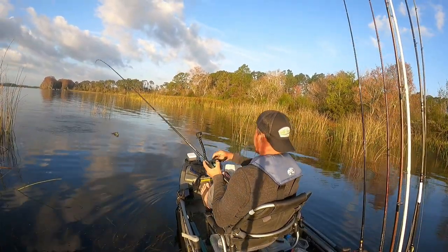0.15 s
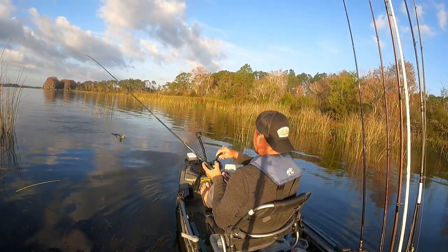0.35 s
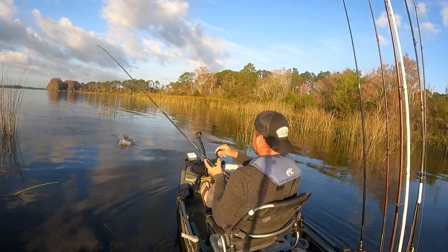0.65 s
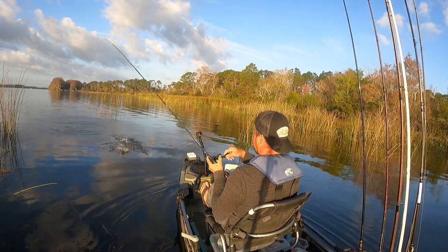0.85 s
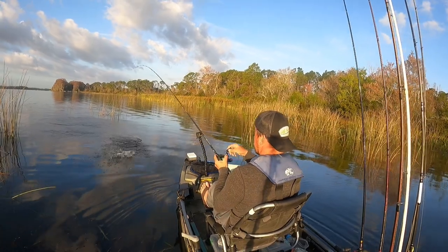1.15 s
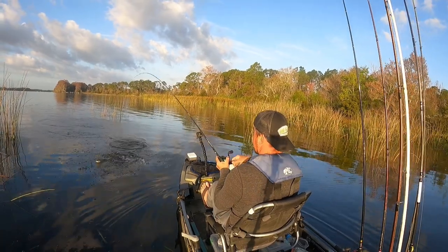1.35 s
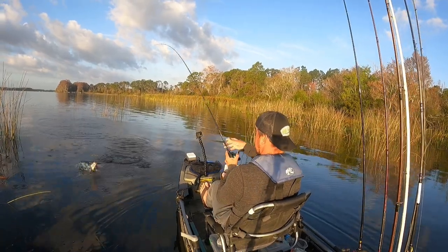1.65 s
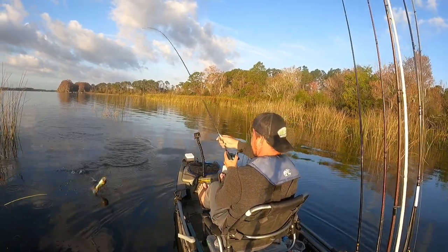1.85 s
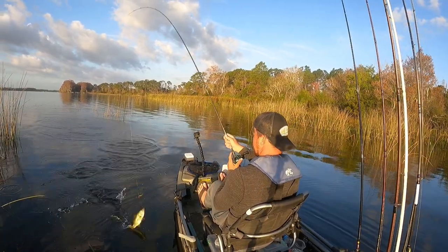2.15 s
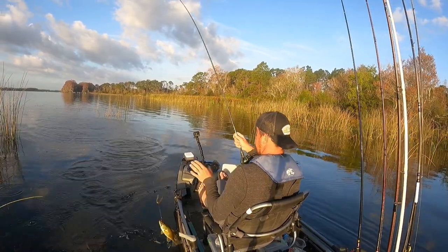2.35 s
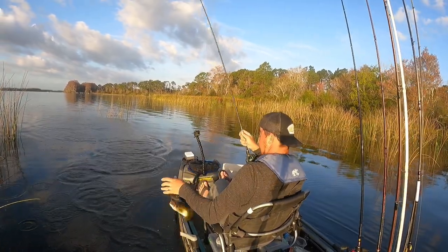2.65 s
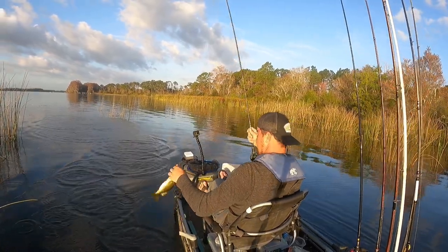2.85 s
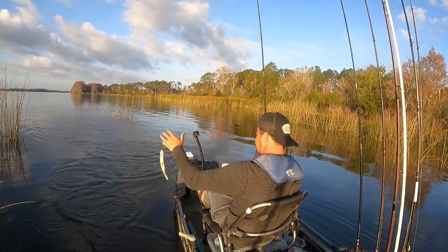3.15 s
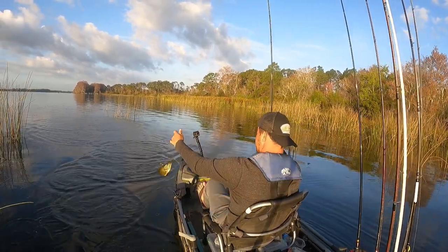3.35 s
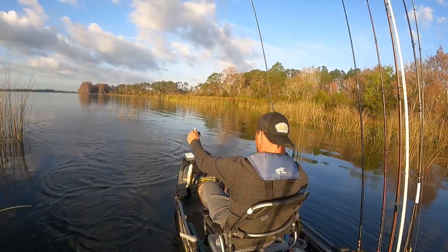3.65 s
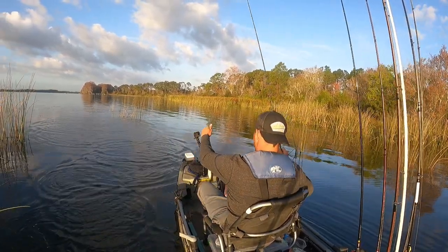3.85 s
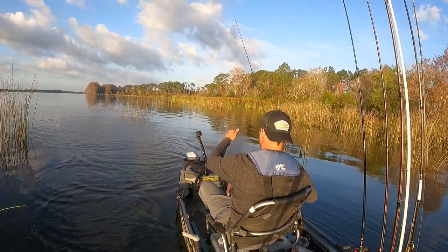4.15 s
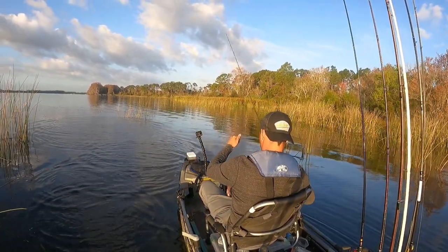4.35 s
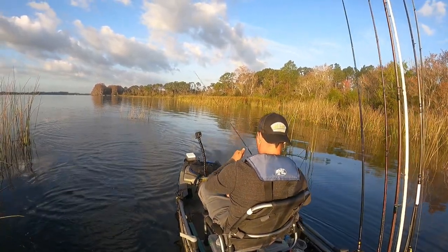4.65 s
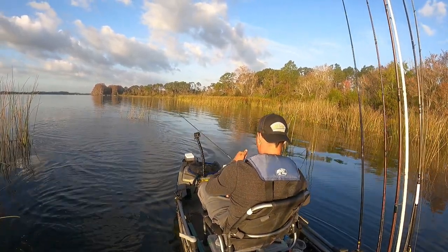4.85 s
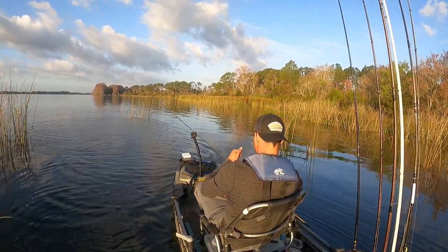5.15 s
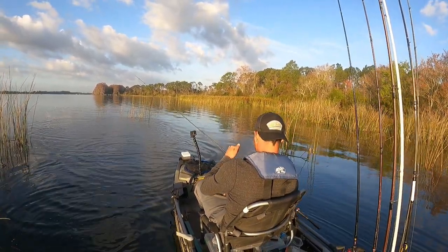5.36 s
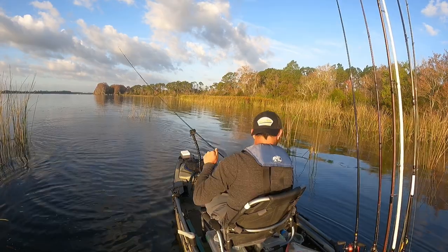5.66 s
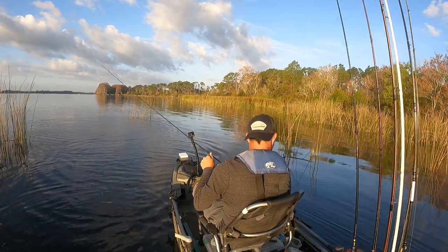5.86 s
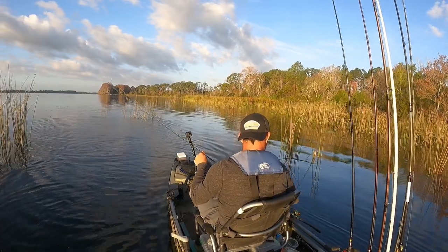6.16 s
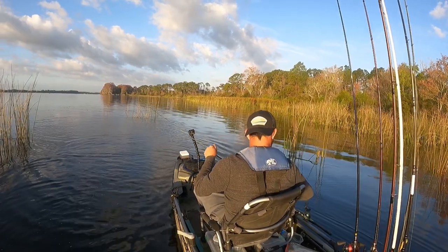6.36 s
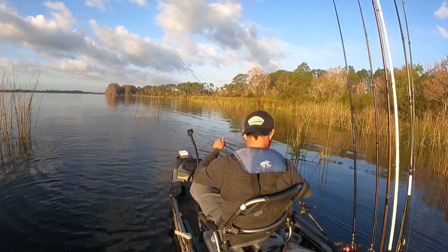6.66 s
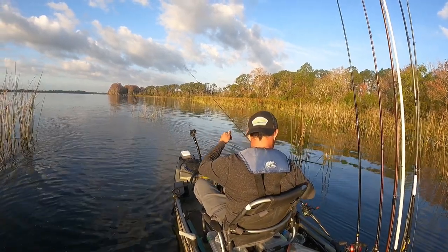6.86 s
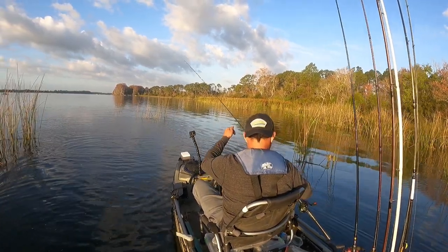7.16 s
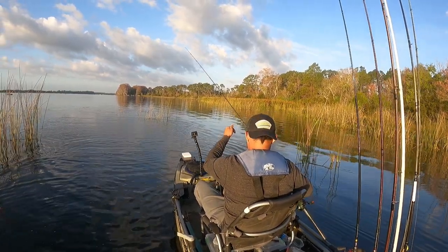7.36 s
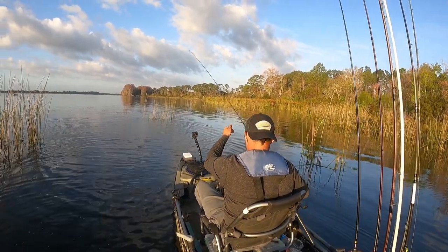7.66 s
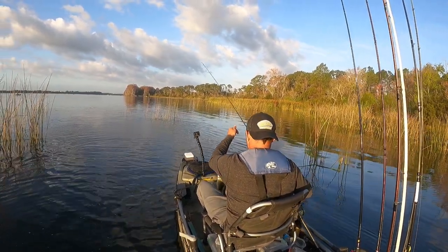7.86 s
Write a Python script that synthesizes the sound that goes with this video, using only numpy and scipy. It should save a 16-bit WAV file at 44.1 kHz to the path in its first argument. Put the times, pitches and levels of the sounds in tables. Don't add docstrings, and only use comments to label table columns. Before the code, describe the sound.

Watery thrashing and plops grow brighter, end in a boomy thud, then quiet ticks give way to clattering hollow plastic knocks on a calm lake.

```python
import sys
import numpy as np
from scipy import signal
from scipy.fft import rfft, irfft
from scipy.io import wavfile
from scipy.ndimage import uniform_filter1d

SR = 44100
rng = np.random.default_rng(int(sys.argv[2]) if len(sys.argv) > 2 else 0)


def level_to_linear(level):
    exponent = np.asarray(level, float) / 20
    return 10 ** exponent


def wav_record(signal):
    frames = np.transpose(np.atleast_2d(signal))
    bounded = np.clip(frames, -1, 1)
    quanta = np.round(bounded * 32767).astype(np.int16)
    wavfile.write(sys.argv[1], SR, quanta)


N = 353241
T = np.arange(N) / SR

# time in seconds, spray level in dB.
THRASH = [(0, -42), (.3, -40.5), (.43, -36.5), (.54, -39.5), (.9, -33), (1.4, -38.5), (1.6, -46.5),
          (1.72, -44), (1.85, -47.5), (2.0, -40.5), (2.1, -43.5), (2.2, -41), (2.5, -50.5), (2.7, -50),
          (3.1, -77)]
# pitch in Hz, level in dB per Hz.
SPRAY_COLOUR = [(290, -29), (500, -7), (839, -8.5), (1670, -3.5), (6930, -2), (8230, -19), (13000, -33),
                (15500, -78)]


def spray():
    fizz = 3.53 * rng.standard_normal(N)
    for hz in np.geomspace(700, 13000, 30):
        cycles = rng.choice([6, 9, 18])
        t = np.arange(int(cycles * SR / hz)) / SR
        rising = np.sin(2 * np.pi * hz * t * (1 + 0.081 * t / t[-1]))
        grain = rising * np.hanning(len(t)) * np.sqrt(hz / 1000)
        bursts = grit(per_s=75, spread_db=3.5, size=N // 2)
        add(fizz, 0, 0.51 * signal.oaconvolve(bursts, grain))
    for hz in (4000, 6500, 10000):
        droplets = grit(per_s=70, spread_db=3.3, size=N // 2)
        add(fizz, 0, 27 * band(droplets, 0.75 * hz, 1.4 * hz))
    fizz = patchy(colour(fizz, SPRAY_COLOUR), 2.8, frames=20, bins=7)
    fizz = evened(patchy(fizz, 1.73, frames=4, bins=70))
    farness = np.exp(-T / 0.62)
    dull_db = along(THRASH + [(3.2, -120)])
    bright_db = dull_db + 4 - 8 * farness
    dull = band(fizz, 270, 6740) - farness * band(fizz, 3150, 7000)
    return level_to_linear(dull_db + 4.5) * dull + level_to_linear(bright_db + 10) * band(fizz, 8530, 16300)


# start in seconds, peak in dB, bubble pitch in Hz, brightness in dB.
SLAPS = [(0.208, -27.5, 2110, 2), (0.446, -14.5, 2150, -10), (0.572, -19.5, 1330, 4),
         (0.626, -19, 1630, -5), (0.717, -23, 1640, -1), (0.751, -18.5, 1040, -7), (0.892, -17, 3180, 1),
         (1.167, -19, 1420, -21), (1.4, -23, 3910, 12.5), (1.468, -25, 1620, -4), (1.554, -23.5, 2024, -2),
         (1.597, -22.5, 1230, -5), (1.968, -8, 2200, -4), (2.012, -30, 4770, 10), (2.049, -16, 1540, -7),
         (2.142, -18, 3350, -8), (2.641, -14, 2420, -22), (2.208, -18.5, 5940, -11)]
# start in seconds, peak in dB, bubble pitch in Hz.
DROPS = [(0.245, -21, 2800), (0.274, -19, 1200), (0.96, -9.5, 4070), (0.99, -14, 3960),
         (1.626, -21.5, 2070), (1.693, -28, 4000), (1.716, -15.5, 3950), (1.733, -16.5, 1096),
         (1.753, -22, 1250), (1.787, -27, 990), (1.843, -26.5, 1380), (1.903, -11, 3580),
         (2.056, -13, 1820), (2.274, -26.5, 1240), (2.437, -24.5, 3030), (2.467, -28, 1550),
         (2.615, -17, 915), (2.633, -7.5, 920), (2.685, -21.5, 1270), (2.658, -13, 1050),
         (2.702, -31, 2000), (1.916, -29, 2480)]
# start in seconds, peak in dB, pitch in Hz.
DRIPS = [
    (2.745, -23, 1620),
    (2.902, -31.5, 1680),
]


def slaps_and_drops():
    hits = SLAPS + with_edge(DROPS, -19.5)
    out = snaps(hits, crack=0.66, rise=4.7, ring_s=0.022, tail_db=-22)
    return out + snaps(with_edge(DRIPS, -26), crack=0.12, rise=0.5, ring_s=0.03, tail_db=-30)


# start in seconds, peak in dB, pitch in Hz, time to fall 60 dB in seconds.
GULPS = [
    (0.713, -15.5, 422, 0.036),
    (0.749, -13.5, 940, 0.024),
    (1.241, -4.5, 500, 0.031),
    (1.257, -13.5, 586, 0.039),
]
# start in seconds, peak in dB, pitch in Hz, time to fall 60 dB in seconds.
PLINKS = [(0.349, -26, 2080, 0.026), (0.391, -29, 4140, 0.015), (0.65, -26, 1490, 0.032),
          (0.705, -25, 1620, .03), (0.903, -21, 1086, 0.035), (0.928, -26, 3010, 0.073),
          (1.007, -18, 1900, 0.018), (1.064, -26, 1940, 0.039), (1.095, -31, 1070, 0.039),
          (1.14, -24, 990, 0.039), (1.188, -30, 4220, 0.026), (1.2, -30, 1900, 0.037),
          (1.329, -14.5, 2100, 0.012), (1.358, -16, 7040, 0.0086), (1.424, -22, 2330, 0.031),
          (1.434, -25, 1900, 0.027), (1.448, -25, 1830, 0.034), (1.4886, -13.5, 4900, 0.012),
          (1.509, -27, 1820, 0.053), (1.531, -26.5, 2050, 0.035), (1.576, -32, 1860, 0.058),
          (1.61, -25, 6100, 0.0084), (1.637, -33, 7200, 0.019), (1.823, -21, 2110, 0.011),
          (1.915, -22.5, 7550, 0.024), (1.99, -29, 1500, 0.016), (2.022, -33, 2600, 0.024),
          (2.026, -23, 4760, 0.032), (2.039, -22, 2850, 0.024), (2.05, -19.5, 4680, 0.033),
          (2.065, -24, 3700, 0.03), (2.14, -26, 1810, 0.028), (2.155, -30, 2250, 0.024),
          (2.172, -30, 5340, 0.056), (2.289, -28.5, 2550, 0.026), (2.318, -27.5, 2300, 0.022),
          (2.389, -31, 2100, 0.039), (2.4, -30, 5100, 0.018), (2.6, -32, 1210, 0.02)]


def bubbles():
    return pings(GULPS, rise=4, rough=0.08) + pings(PLINKS, rise=0.8)


# start in seconds, peak in dB,
# hardness as dB of the upper hull modes, pitch of the struck panel in Hz.
THUMPS = [(2.616, -2, -13, 228), (2.639, -3, -10, 99), (2.658, -21, 2, 108), (2.689, -13, -31, 103),
          (4.017, -5, -17, 314), (4.069, -13.5, -44, 270), (4.205, -14.5, -40, 270),
          (4.335, -10.5, -34, 177), (4.381, -16, -33, 98), (7.736, -18, -27, 172), (7.821, -5.5, -24, 254),
          (7.892, -9, -8.5, 240), (7.929, -9, -15, 219), (7.989, -29, -29, 97)]
# start in seconds, peak in dB,
# hardness in dB, panel pitch in Hz.
KNOCKS = [(5.118, -16, 3, 193.5), (5.139, -14.5, 4, 215), (5.208, -21, -1, 227), (5.261, -30, -8, 353),
          (5.389, -15.5, -30, 151), (5.437, -2.5, -0.5, 237), (5.469, 1.5, -30, 146.5),
          (5.545, -5.5, -2.5, 226), (5.6, -10, -13, 221), (5.64, -5.5, -7, 141.4), (5.686, -1.5, -5.5, 211),
          (5.719, -8.5, -16, 161), (5.749, -14, -6.5, 145), (5.881, -25, 0, 215), (5.999, -17.5, -10, 215),
          (6.08, -9.5, -7, 204.6), (6.186, -5, -5, 192), (6.24, -7, -8, 192), (6.272, -6.5, -9, 184),
          (6.314, -4, -6.5, 173.6), (6.434, -6.5, -7.5, 175.3), (6.936, 3, -6.5, 355),
          (6.957, 0.5, -22, 172), (7.024, -8.5, -3.5, 362), (7.058, -17.5, 1, 302), (7.21, -31, 9.5, 173),
          (7.261, -23.5, -5, 384),
          (2.627, -3.5, -13, 275), (4.337, -13.5, -20, 139), (5.447, -1.5, -8, 382), (5.484, -8, -28, 149),
           (5.605, -4, -8, 199), (5.627, -18, -13, 200), (5.702, -7.5, -2.5, 231), (5.736, -2, -17, 166.5),
           (6.945, -3, -12, 355), (6.974, -1.5, -25, 355), (7.051, -22, -11, 352)]
# pitch in Hz, level in dB, time to fall 60 dB in seconds.
HULL = [(145, -7.5, 0.62), (170.8, -2, 0.28), (205.2, 5.5, 0.15), (249.3, 5, 0.11), (355, 2, 0.053),
        (415.3, -4, 0.14)]
# pitch in Hz, level in dB, time to fall 60 dB in seconds.
UPPER = [(467, -7, 0.16), (551, 7.5, 0.058), (602, -5.5, 0.16), (660, -3.5, 0.092), (796, -0.5, 0.1),
         (963, -3.5, 0.069), (1550, -15, 0.097)]


def hull_blows():
    rows = panels(THUMPS, cycles=11.2) + panels(KNOCKS, cycles=19)
    out, t = np.zeros(N), np.arange(SR // 3) / SR
    for (s, db, hard_db, hz, t60), luck in zip(rows, rng.standard_normal((len(rows), 14))):
        contact, blur = rng.standard_normal((2, len(t)))
        contact *= np.exp(-t / 0.0081) * np.minimum(t / 0.0029, 1)
        contact += 0.43 * np.exp(-((t - 0.0015) / 0.00043) ** 2)
        low = peaked(ring(contact, hz, t60)) + 0.57 * peaked(modes(contact, HULL, luck[:6]))
        tail = band(band(blur, 163, 1500), 305, 652)
        tail *= level_to_linear(-60 * t / 0.14) * np.minimum(t / 0.0044, 1)
        upper = peaked(modes(contact, UPPER, luck[6:])) + 1.57 * peaked(tail)
        add(out, s, level_to_linear(db) * (peaked(low) + level_to_linear(hard_db) * peaked(upper)))
    return band(out, 83, 8300)


def panels(rows, cycles):
    return [(s, db, hard_db, hz, cycles / hz * level_to_linear(-0.32 * db)) for s, db, hard_db, hz in rows]


# start in seconds, peak in dB, pitch in Hz, time to fall 60 dB in seconds.
NOTES = [(5.447, -9, 552, 0.13), (5.546, -26, 805, 0.18), (5.548, -12, 389, 0.14), (5.652, -16, 953, .1),
         (5.688, -10.5, 396, .1), (6.082, -19, 390, 0.1), (6.24, -12, 420, .12), (6.314, -19.5, 648, 0.086),
         (6.435, -15.5, 449, 0.17), (6.435, -19, 680, .09), (6.976, -11, 169.7, 0.295),
         (6.812, -32.5, 1530, .05)]


def panel_notes():
    return pings(NOTES, rise=0, rough=0.32)


# start in seconds, length in seconds, hull rumble in dB, rasp in dB.
DRAGS = [(2.607, 0.086, -19, -33.5), (3.41, 0.23, -46, -47.5), (3.794, 0.24, -36, -55.5),
         (4, 0.38, -43, -59.5), (4.292, 0.13, -49, -60), (4.488, 0.1, -53, -58), (4.747, 0.11, -38, -57),
         (5.101, 0.1, -22.5, -56), (5.202, 0.92, -38.5, -58), (5.36, 0.74, -23, -50),
         (5.427, 0.079, -15, -30), (5.492, 0.12, -40, -39.5), (5.584, 0.16, -15.5, -40),
         (5.675, 0.13, -16.5, -34), (5.785, 0.18, -32, -54), (5.928, 0.24, -40, -60.5),
         (6.058, 0.29, -23.5, -45), (6.126, 0.49, -29, -46), (6.924, 0.062, -23, -35.5),
         (6.931, 0.2, -22, -43), (7.1, 0.16, -31, -53), (7.207, 0.11, -42, -47), (7.436, 0.11, -58, -57),
         (7.726, 0.23, -32.5, -55), (7.827, 0.26, -37, -56)]
# pitch in Hz, width in Hz, level in dB.
RASP = [(1640, 50, -10), (2100, 140, -2), (2420, 1000, 7), (3010, 210, 4), (4260, 110, -2.5),
        (4980, 64, -2)]


def drags():
    slips, even_luck = grit(per_s=600, spread_db=3.7, size=N), np.zeros(len(UPPER))
    hull = evened(modes(slips, HULL, even_luck)) + 0.19 * evened(modes(slips, UPPER, even_luck))
    slips = grit(per_s=1300, spread_db=2.4, size=N)
    rasp = sum(level_to_linear(db) * evened(ring(slips, hz, 1.7 / width)) for hz, width, db in RASP)
    scratch = band(colour(slips, TICK_COLOUR), 700, 11000)
    rasp = patchy(evened(rasp) + evened(scratch), 2.4, frames=8, bins=12)
    hull_gain, rasp_gain = np.zeros((2, N))
    for s, length, hull_db, rasp_db in DRAGS:
        add(hull_gain, s, level_to_linear(hull_db) * stroke(length))
        add(rasp_gain, s, level_to_linear(rasp_db) * stroke(length))
    return hull_gain * evened(hull) + rasp_gain * evened(rasp)


def stroke(length):
    u = np.linspace(0, 1, int(length * SR))
    return np.minimum(1, np.minimum(u / 0.093, (1 - u) / 0.5)) * (1 - 0.38 * u)


# start in seconds, peak in dB, pitch in Hz.
REEL = [(3.2194, -25, 2000), (3.2943, -34.5, 1760), (3.4046, -32.5, 2260), (3.475, -31, 2450),
        (3.6541, -35.5, 2000), (3.676, -35.5, 2520), (3.698, -38.5, 2490), (4.333, -39, 3380),
        (4.5575, -38.5, 2030), (4.59, -40, 2380), (4.6314, -36, 2270), (4.72, -33, 2250)]
# start in seconds, peak in dB, pitch in Hz.
TACKLE = [(5.132, -24.5, 2740), (5.4947, -29, 2190), (5.5447, -17.5, 2020), (5.6386, -8.5, 2700),
          (5.686, -12.5, 2390), (5.8163, -27, 1700), (6.0827, -31, 1870), (6.126, -29, 1760),
          (6.1838, -17, 2700), (6.2368, -23, 2630), (6.2775, -11.5, 2560), (6.314, -17, 1830),
          (6.356, -31.5, 2400), (6.8123, -32.5, 2100), (7.0608, -30, 2000), (7.0877, -33, 2100),
          (7.1811, -27.5, 2495), (7.214, -31, 1850), (7.731, -25.5, 2930), (7.815, -19, 2993),
          (7.891, -24, 2770), (7.929, -26, 2230)]
# start in seconds, peak in dB, pitch in Hz, brightness in dB.
CLACKS = [
    (3.454, -31, 3720, 4),
    (4.015, -35.5, 1930, -2.5),
    (5.109, -32, 3490, -6),
    (5.436, -11.5, 2085, -4),
    (5.602, -16.5, 3090, -15),
    (5.877, -29, 3200, -14),
    (6.433, -15, 2340, -11),
    (6.933, -8, 2420, -14),
    (7.0227, -31, 1860, 2),
]


def ticks():
    rows = with_edge(REEL, -44) + with_edge(TACKLE, -36) + CLACKS
    return snaps(rows, crack=0.68, rise=0, ring_s=0.024, tail_db=-11)


# start in seconds, length in seconds, clicks per second, peak in dB, pitch in
# Hz.
RATCHET = [
    (3.452, 0.11, 73, -38, 2270),
    (4.059, 0.22, 50, -43.5, 2200),
]


def ratchet():
    clicks = []
    for s, length, per_s, db, hz in RATCHET:
        for at in np.arange(s, s + length, 1 / per_s):
            clicks.append((at + 0.0017 * rng.random(), db, hz, -16))
    return snaps(clicks, crack=0.6, rise=0, ring_s=0.014, tail_db=-30)


# start in seconds, peak in dB, pitch in Hz, time to fall 60 dB in seconds.
JINGLES = [(5.111, -28, 8700, 0.014), (5.112, -43, 12500, .015), (7.731, -32, 720, .04),
           (7.732, -36, 2240, 0.043), (7.816, -32, 1870, .04), (6.644, -48, 8210, .012),
           (6.669, -51, 8100, .015), (6.698, -50, 8800, .012), (6.72, -48, 8000, .012),
           (6.732, -37, 7250, 0.011), (6.83, -42, 8150, .012), (6.878, -48, 5800, .015),
           (3.457, -39, 7450, 0.075), (5.111, -36, 5080, 0.071), (5.437, -21.5, 1643, 0.04),
           (5.438, -7.5, 868, 0.044), (5.47, -21, 3080, 0.027), (5.508, -37, 12000, .012),
           (5.64, -36, 12400, .02), (5.657, -40, 7500, .02), (5.714, -36, 8900, 0.011),
           (5.745, -26, 1630, 0.042), (5.918, -34, 8240, 0.011), (6.082, -30, 1600, 0.075),
           (6.188, -32, 5500, 0.034), (6.232, -27, 2890, 0.033), (6.265, -24, 2460, 0.024),
           (6.434, -32, 4800, 0.056), (6.933, -15, 5600, 0.027), (6.934, -5.5, 3010, 0.024),
           (6.936, -18, 1625, 0.11), (6.94, -28.5, 4840, 0.084), (6.964, -32, 1620, 0.037),
           (6.965, -34, 5460, 0.025), (7.024, -33, 6770, 0.03), (7.027, -38, 1600, 0.11),
           (7.052, -46, 6500, .06), (7.052, -33, 2390, 0.032), (7.174, -46, 4040, 0.068),
           (7.183, -25, 1500, 0.036)]


def jingles():
    return pings(JINGLES, rise=0)


# start in seconds, length in seconds, first pitch in Hz, last pitch in Hz, level in dB.
SQUEAKS = [(0.00097, 0.1, 2100, 2100, -43), (0.711, 0.035, 428, 824, -33), (1.183, 0.13, 217.5, 726, -31.5),
           (1.241, 0.1, 2050, 2100, -41), (1.28, 0.067, 310, 427, -38.5), (1.289, 0.057, 1495, 1680, -37),
           (6.655, 0.082, 8300, 7600, -58.5), (6.104, 0.077, 5350, 5640, -55),
           (5.135, 0.043, 1670, 1620, -51), (7.214, 0.064, 1700, 1560, -43),
           (5.151, 0.14, 370.4, 355, -30.5), (7.213, 0.076, 4620, 4900, -50),
           (7.22, 0.068, 1048, 906, -39.5), (7.22, 0.047, 3500, 3500, -55), (7.257, 0.031, 1620, 1630, -36),
           (7.82, 0.13, 2820, 3010, -49)]
# start in seconds, length in seconds, first pitch in Hz, last pitch in Hz, level in dB.
WHISTLES = [
    (1.025, .04, 5350, 5400, -37),
    (2.19, 0.1, 2660, 2660, -52),
    (2.47, 0.12, 3100, 3120, -62),
    (2.74, 0.1, 2800, 2780, -62),
    (2.76, 0.095, 3100, 3240, -56),
    (5.282, 0.033, 5600, 4670, -54),
    (5.39, 0.034, 5540, 5600, -60),
    (5.33, 0.11, 2880, 2960, -61),
]


def squeaks():
    return glides(SQUEAKS, fuzz=1.6) + glides(WHISTLES, fuzz=0.25)


def glides(rows, fuzz):
    out = np.zeros(N)
    for s, length, from_hz, to_hz, db in rows:
        hz = np.geomspace(from_hz, to_hz, int(length * SR))
        fuzz_hz = fuzz * (90 + 0.07 * from_hz)
        a, b = uniform_filter1d(rng.standard_normal((2, len(hz))), int(SR / fuzz_hz), 1)
        turn = np.exp(2j * np.pi * np.cumsum(hz) / SR)
        tone = ((0.23 + a + 1j * b) * turn).real
        add(out, s, level_to_linear(db) * evened(tone) * signal.windows.tukey(len(hz), 0.4))
    return out


# start in seconds, peak in dB, pitch in Hz, time to fall 60 dB in seconds.
POLE = [
    (2.618, -4, 68, 0.25),
    (2.629, -12, 200, .15),
    (2.63, -19, 1500, .004),
]
# start in seconds, peak in dB, pitch in Hz, time to fall 60 dB in seconds.
SHUDDER = [
    (2.62, -18, 40, 0.34),
]


def pole():
    out, t = np.zeros(N), np.arange(SR) / SR
    for s, db, hz, t60 in POLE:
        jolt = rng.standard_normal(SR) * np.exp(-t / 0.041)
        add(out, s, level_to_linear(db) * peaked(ring(jolt, hz, t60)))
    return out + pings(SHUDDER, rise=0)


# middle in seconds, half width in seconds, swell in dB.
SWAYS = [
    (4.4, 0.28, 7),
    (5.7, 0.17, 13),
    (6.301, 0.14, 8),
    (8.0, 0.21, 11.5),
]
# time in seconds, level in dB.
HUM_DB = [(0, -28.5), (2.6, -29.5), (3.5, -34.5), (8.02, -32.5)]
# pitch in Hz, level in dB per Hz.
DRONE = [(20, -18), (54, -3.5), (210, -3), (505, -23), (700, -21.5), (1450, -31), (1770, -40),
         (15500, -64.5)]


def drone():
    sway_db = sum(db * np.exp(-((T - s) / width) ** 2) for s, width, db in SWAYS)
    hum_db = along(HUM_DB) + sway_db
    wash_db = -37 + 0.34 * sway_db
    wash = colour(patchy(rng.standard_normal(N), 0.18, frames=24, bins=4), DRONE)
    slosh_db = 9.5 * sway_db / 10 - 10
    hum = level_to_linear(slosh_db) * evened(band(wash, 30, 96))
    hum += 1.2 * evened(ring(rng.standard_normal(N), 73.3, 0.15))
    hum += 0.5 * evened(ring(rng.standard_normal(N), 143.7, 0.19))
    wash = band(wash, 161, 4000) + patchy(band(wash, 4000, 8500), 2.5, frames=40, bins=30)
    insects_db = -62.5 + np.sin(2 * np.pi * 0.89 * T)
    insects = level_to_linear(insects_db) * evened(band(rng.standard_normal(N), 3230, 3880))
    return level_to_linear(hum_db) * evened(hum) + level_to_linear(wash_db) * evened(wash) + insects


# pitch in Hz, level in dB per Hz.
TICK_COLOUR = [(710, -16), (1200, -9.5), (1670, -4), (1880, -16.5), (3080, -11.5), (4110, -15.5),
               (5730, -19.5), (15500, -47)]


def snaps(events, crack, rise, ring_s, tail_db):
    out, t = np.zeros(N), np.arange(SR // 10) / SR
    sizzle = colour(band(rng.standard_normal(N), 5140, 13000), TICK_COLOUR)
    tail_shape = level_to_linear(-60 * t / 0.09) * np.minimum(t / 0.004, 1)
    tail = level_to_linear(tail_db) * tail_shape
    for (s, db, hz, bright_db), luck in zip(events, rng.uniform(0.13, 0.99, len(events))):
        fall = level_to_linear(-60 * (t / (ring_s * luck)) ** 1.5) * np.minimum(t / 0.0021, 1)
        bell = np.sin(2 * np.pi * hz * (t + rise * t ** 2)) * fall
        noise = evened(band(rng.standard_normal(len(t)), 0.49 * hz, 1.48 * hz))
        body = peaked(bell + crack * noise * (fall + tail))
        quick = level_to_linear(-60 * (t / (0.45 * ring_s * luck)) ** 1.5) * np.minimum(t / 0.0051, 1) ** 2
        quick += level_to_linear(-17) * tail
        here = (round(s * SR) + np.arange(len(t))) % N
        edge = peaked(sizzle[here] * quick)
        add(out, s, level_to_linear(db) * (body + level_to_linear(bright_db) * edge))
    return out


def with_edge(rows, bright_db):
    return [(*row, bright_db) for row in rows]


def pings(rows, rise, rough=1.27):
    out, t = np.zeros(N), np.arange(SR // 4) / SR
    for (s, db, hz, t60), scratch in zip(rows, rng.standard_normal((len(rows), 200))):
        tone = np.sin(2 * np.pi * hz * (t + rise * t ** 2))
        wobble = 1 + rough * np.interp(t, np.arange(200) * t60 / 35, scratch)
        onset = np.minimum(t / max(0.0023, 1.35 / hz), 1)
        add(out, s, level_to_linear(db - 60 * t / t60) * onset * wobble * tone)
    return out


def ring(x, hz, t60):
    r = np.exp(-np.log(1000) / (max(t60, 0.004) * SR))
    w = 2 * np.pi * hz / SR
    return signal.lfilter([0, np.sin(w)], [1, -2 * r * np.cos(w), r * r], x)


def modes(x, table, luck):
    return sum(level_to_linear(db + 2.5 * k) * ring(x, hz, t60) for (hz, db, t60), k in zip(table, luck))


def grit(per_s, spread_db, size):
    out, count = np.zeros(size), int(per_s * size / SR)
    heights = level_to_linear(spread_db * np.minimum(rng.exponential(1, count), 4))
    out[rng.integers(0, size, count)] = heights * rng.choice([-1, 1], count)
    return out


def patchy(x, patchy_db, frames, bins):
    z = signal.stft(x, nperseg=512, noverlap=384)[2]
    blurred = uniform_filter1d(rng.standard_normal(z.shape), bins, 0)
    patches = evened(uniform_filter1d(blurred, frames, 1))
    return signal.istft(z * level_to_linear(patchy_db * patches), nperseg=512, noverlap=384)[1][:N]


def colour(x, points):
    hz = abs(np.fft.fftfreq(4096, 1 / SR))
    gain = np.log(level_to_linear(np.maximum(read(points, hz), -100)))
    taps = np.fft.ifft(np.exp(gain - 1j * signal.hilbert(gain).imag)).real[:2048]
    return signal.oaconvolve(x, taps)[:len(x)]


def band(x, lo_hz, hi_hz):
    return signal.sosfilt(signal.butter(2, [lo_hz, hi_hz], "band", fs=SR, output="sos"), x)


def evened(x):
    return x / np.sqrt(np.mean(x ** 2) + 1e-20)


def peaked(x):
    return x / abs(x).max()


def read(points, hz):
    f, value = np.transpose(points)
    return np.interp(np.log(hz + 1), np.log(f + 1), value)


def along(rows):
    return np.interp(T, *np.transpose(rows))


def add(mix, s, sound):
    part = mix[round(s * SR):][:len(sound)]
    part += sound[:len(part)]


# pitch in Hz, left over right in dB.
PORT_DB = [(60, 1), (500, 3), (2500, 2), (4300, 2), (7000, 5), (12000, 5.5)]
# pitch in Hz, lag of the left in radians.
PORT_LAG = [(80, 0.2), (215, 0.15), (400, 0.77), (2600, 0.43), (4300, 0.015)]


def ports(mid):
    hz = np.fft.rfftfreq(N, 1 / SR)
    ratio = level_to_linear(read(PORT_DB, hz)) * np.exp(-1j * read(PORT_LAG, hz))
    direct = irfft(rfft(mid) * (ratio - 1) / (ratio + 1), N)
    scatter = rng.standard_normal(900) * np.exp(-np.arange(900) / 250)
    diffuse = signal.oaconvolve(mid, scatter / np.linalg.norm(scatter))[:N]
    return direct + level_to_linear(-11.5) * band(diffuse, 350, 15000) + level_to_linear(-5.5) * band(diffuse, 10000, 15160)


def scene():
    water = spray() + slaps_and_drops() + bubbles()
    hull = hull_blows() + panel_notes() + drags()
    gear = ticks() + ratchet() + jingles() + squeaks()
    mid = water + hull + gear + drone()
    shake = pole()
    side = ports(mid) + shake
    mid = mid + 0.5 * shake
    return np.array([mid + side, mid - side])


# time in seconds, gain of left minus right in dB.
WIDTH = [(0, -0.5), (2.75, 1.5), (3.0, -5.5), (3.4, -31), (3.6, -83)]


def fold_ports(dry):
    mid, side = (dry[0] + dry[1]) / 2, (dry[0] - dry[1]) / 2
    side = side * level_to_linear(along(WIDTH))
    return np.array([mid + side, mid - side])


def band_limit(x):
    return signal.sosfilt(signal.butter(12, 15640, fs=SR, output="sos"), x)


def record(dry):
    clipped = np.clip(fold_ports(dry), -1, 1)
    treble_cut = signal.firwin(255, 15450, fs=SR)
    mix = signal.oaconvolve(clipped, treble_cut[None], "same")
    return band_limit(mix * np.minimum((T[-1] - T) / 0.0033, 1))


dry = scene()
out = record(dry)
wav_record(out)
```